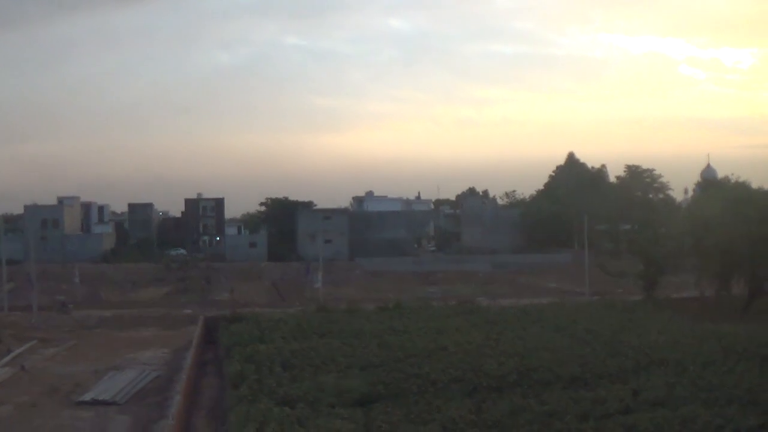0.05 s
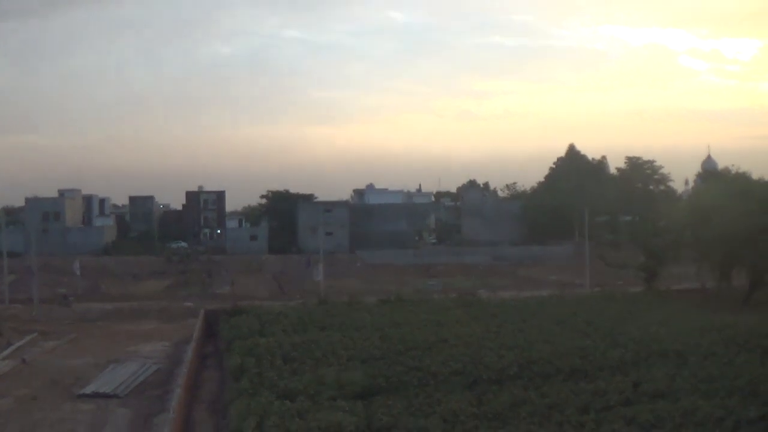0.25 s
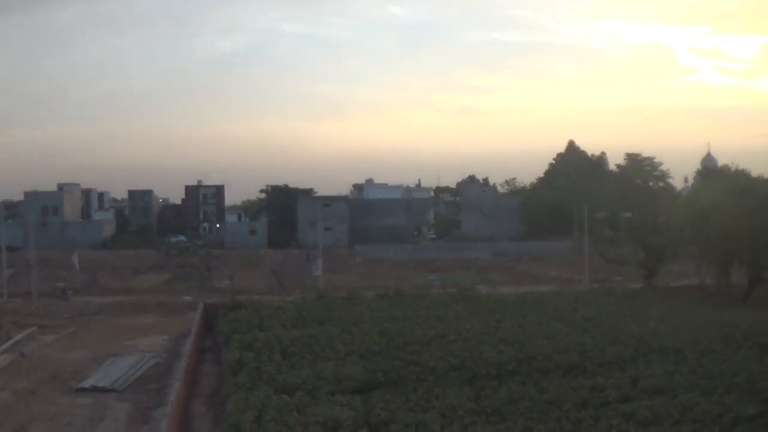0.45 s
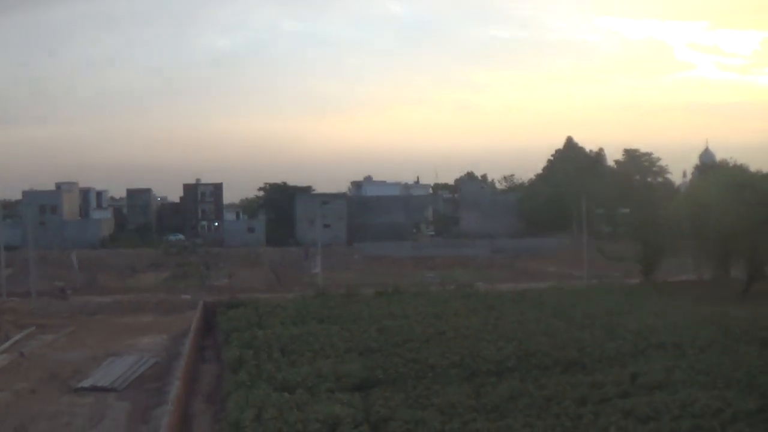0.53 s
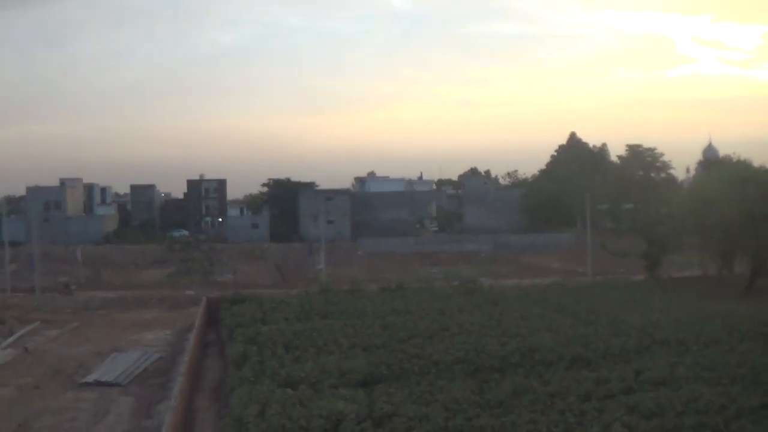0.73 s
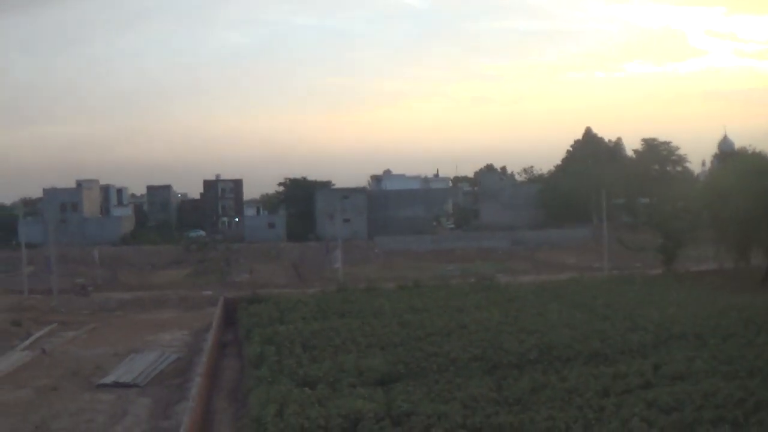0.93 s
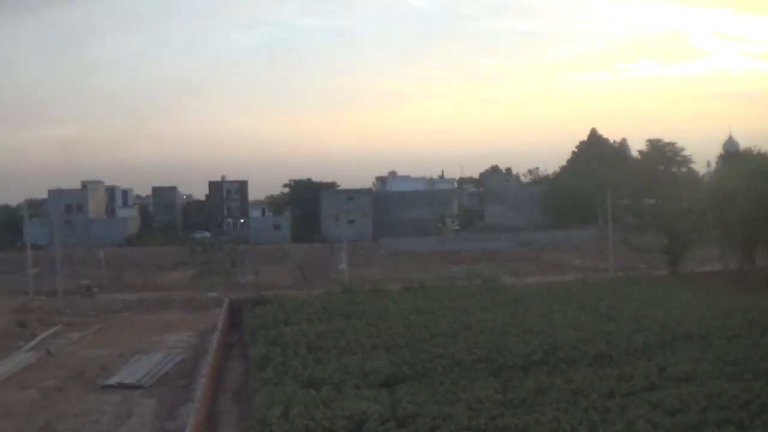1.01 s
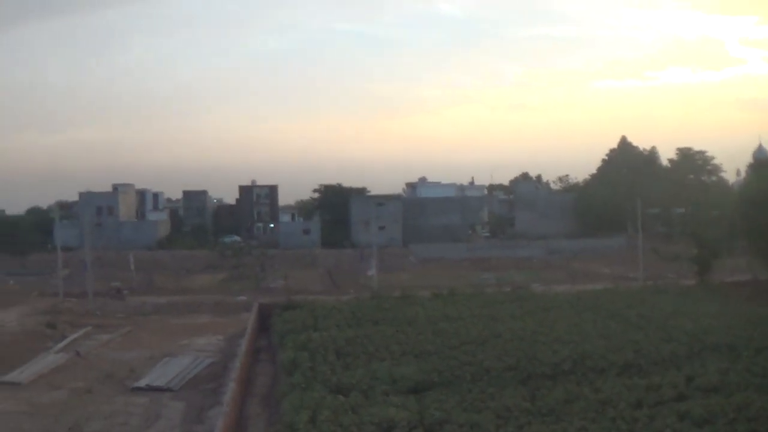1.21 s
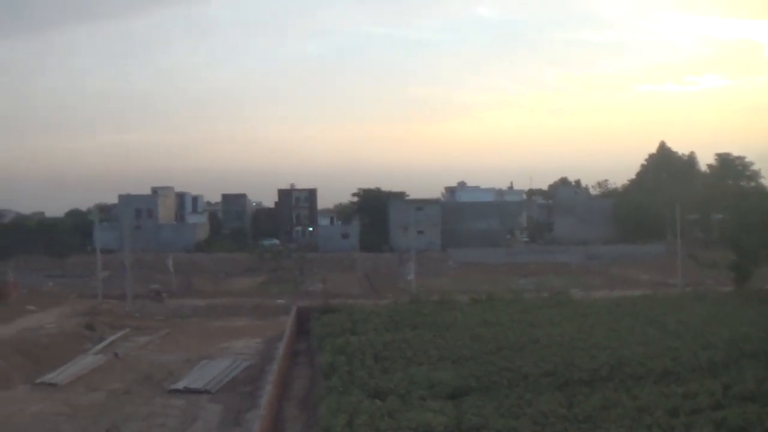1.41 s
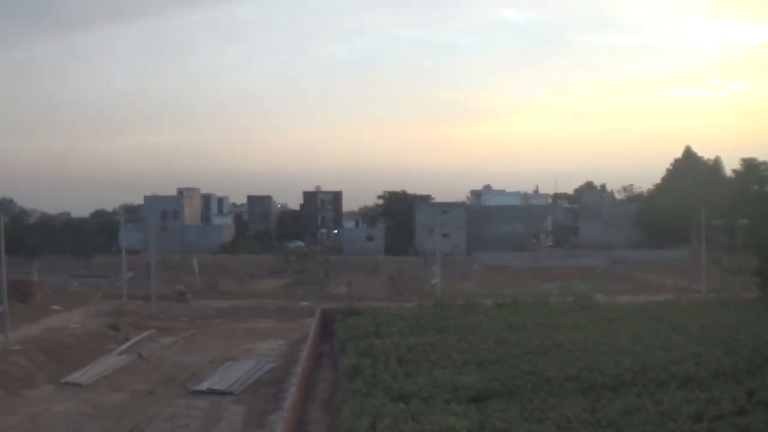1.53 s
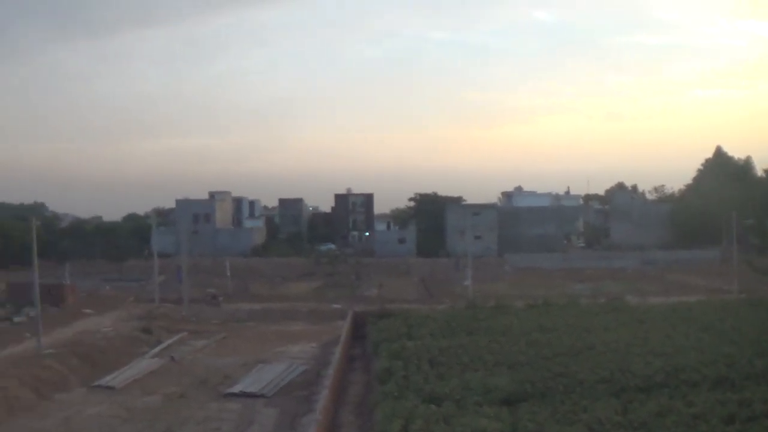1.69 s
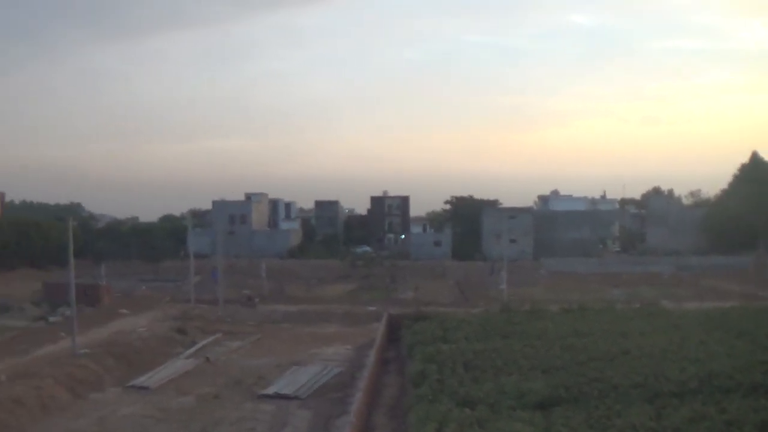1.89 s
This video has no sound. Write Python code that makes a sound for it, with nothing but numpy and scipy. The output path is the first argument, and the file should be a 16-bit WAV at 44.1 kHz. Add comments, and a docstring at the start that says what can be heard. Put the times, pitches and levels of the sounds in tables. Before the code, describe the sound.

Over an open field, a nearby bird rasps, then sings two quick phrases of chirp, whistle and buzzy trill, left of the microphone. Walls return slight echoes, while a far bird, a distant town and light wind stay faint.

```python
"""A rasp from a myna-like bird, close on the left above an open field; then twice a chirp, a whistle
and a buzzy trill. Its syrinx makes gliding tones with air hiss; throat and beak shape the overtones.
The voice bounces off nearby masonry and returns from a wall on the right. A far bird whistles faintly,
a town murmurs in the distance and light wind bumps the microphone."""
import sys
import numpy as np
from scipy import signal
from scipy.fft import rfft, irfft
from scipy.io import wavfile
from scipy.ndimage import uniform_filter1d

SR = 44100
rng = np.random.default_rng(int(sys.argv[2]) if len(sys.argv) > 2 else 0)


def unload_wav(signal):
    """Save mono or channel-first audio to the path in sys.argv[1] as 16-bit WAV at rate SR, clipped to [-1, 1]."""
    wavfile.write(
        sys.argv[1],
        SR,
        np.round(np.clip(np.atleast_2d(signal).T, -1, 1) * 32767).astype(np.int16),
    )


N = 85995
T = np.arange(N) / SR

BIRD_DB = -4  # near bird; its levels below are relative to this
# (time [s], pitch between flicks [Hz], level [dB], flick rise [s], accent at throat ring [dB])
RASP = [(0.129, 2386, -49.5, 0.0008, 7.5), (0.169, 2626, -47, .0009, 16.5),
        (0.224, 2850, -40.5, 0.0011, 12.5), (.27, 2900, -35.5, 0.0038, 10.5),
        (0.319, 2986, -32.5, 0.0058, 8), (.39, 2922, -35.5, 0.0049, 11.5), (0.402, 3080, -40, 0.0024, 7)]
# (time [s], flick rate [1/s])
FLICK_RATE = [(.131, 50), (.21, 52.5), (.28, 55), (.32, 67), (.39, 65)]
# per syrinx side: (time from chirp start [s], pitch [Hz], level [dB])
CHIRP_SIDES = [
    [(0, 2600, -46), (.01, 3070, -29), (.016, 3252, -28), (.021, 2655, -31), (.027, 2110, -28.5)],
    [(.02, 5040, -56), (.028, 4346, -39), (.031, 3423, -27.5), (.034, 2606, -43), (.041, 2606, -27),
     (.046, 2900, -24), (.056, 2802, -30.5), (.06, 2745, -33), (.067, 2207, -30.5), (.071, 2070, -59)],
]
# (start [s], gain [dB])
CHIRPS = [(0.5474, -4), (1.152, -1)]
# (start [s], length [s], pitch [Hz], peak level [dB])
WHISTLES = [(0.615, 0.069, 1932, -28), (1.223, 0.046, 1915, -25.5)]
# per trill: (time [s], pitch [Hz], pulse rate [1/s], fundamental [dB], overtones [dB], warble [0-1])
TRILLS = [
    [(.7445, 1733, 67, -58, -37.5, 0.01), (.79, 1900, 67, -47.5, -31, 0),
     (.825, 2040, 68, -38.5, -27.5, 0.06), (.85, 2219, 68.5, -39.5, -28, 0.01),
     (.90, 2474, 73, -25, -31.5, 0.08), (.95, 2673, 100, -22.5, -34, 0.89),
     (1.0, 2789, 109, -23.5, -27, 0.77), (1.038, 2824, 106, -25, -32.5, 0.63),
     (1.052, 2654, 100, -42, -56, 0.5)],
    [(1.385, 1740, 71, -54, -40, 0.18), (1.415, 1890, 72, -42, -31, 0), (1.44, 2034, 74, -44, -30.5, 0),
     (1.497, 1999, 80, -38, -27, 0.1), (1.533, 2352, 71, -27, -30, 0), (1.57, 2513, 84, -21.5, -41, 0.86),
     (1.61, 2672, 91, -23.5, -26.5, 0.75), (1.636, 3064, 110, -27.5, -33, 1),
     (1.678, 3232, 110, -27.5, -30.5, 0.38), (1.698, 3130, 110, -55, -42, 0.4)],
]
# throat and beak filter on the overtones: (frequency [Hz], gain [dB])
THROAT = [(3300, -9.5), (4000, 0.5), (4700, -11), (5200, -23), (5700, -12), (6000, -11), (6400, -14.5),
          (7100, -16.5), (7800, -15.5), (8500, -25.5), (9200, -18.5), (10200, -21.5)]
# same, beak held wide: (frequency [Hz], gain [dB])
RASP_THROAT = [(5000, -8), (6000, -17), (6750, -10.5), (8800, -25.5), (10300, -15.5)]
# air noise in the voice: (frequency [Hz], gain [dB])
HISS_COLOUR = [(800, -9), (1600, 13.5), (3000, 3), (4500, 12), (5400, 4), (10500, -9)]
# near bird: (frequency [Hz], left boost and right cut [dB])
BIRD_PAN = [(3000, 5.5), (4200, 7), (6000, 4.5), (9000, 1.4)]
# far bird, per note: (time [s], pitch [Hz], level [dB])
FAR_NOTES = [
    [(0, 1205, -54), (.145, 1255, -49), (.16, 1290, -54)],
    [(.38, 1318, -55), (.5, 1332, -51), (.59, 1415, -48), (.64, 1525, -47), (.67, 1555, -43),
     (.725, 1370, -48)],
]
# nearby masonry: (delay [s], left [dB], right [dB])
NEAR_ECHOES = [(.0055, -6.5, -2), (0.0144, -28, -16)]
# far walls: (delay [s], left [dB], right [dB])
FAR_ECHOES = [(0.0758, -17, -9), (0.109, -17.5, -14)]
# far wall reflection: (frequency [Hz], gain [dB])
WALL_COLOUR = [(2000, 4.5), (3600, -4), (7800, 3.5), (9200, 10), (10500, -8)]
# distant murmur: (frequency [Hz], gain [dB])
TOWN_COLOUR = [(40, -26), (100, -11.5), (170, -4), (320, -0.5), (420, -4), (800, -1.5), (1150, -7),
               (1900, -11), (6000, -22), (11000, -29.5)]
# rumble: (time [s], level [dB])
WIND = [(0, -78), (.63, -58.5), (.69, -49), (.83, -49), (.92, -62), (1.15, -51), (1.24, -44.5),
        (1.45, -49.5), (1.56, -53.5), (1.95, -59)]
# puffs on the microphone: (time [s], peak [dB])
PUFFS = [(1.012, -37), (1.636, -34.5)]

FLICK_TOP_HZ, FLICK_FALL_S, RING_HZ, RING_HALF_WIDTH_HZ = 4413, 0.0021, 3756, 370
RASP_OVERTONES_DB, CHIRP_OVERTONES_DB, WHISTLE_OVERTONES_DB = -3.5, -5, -26.5
WHISTLE_SWELL_DB, WHISTLE_TOP_SHARE, WHISTLE_BEND_HZ = 9, 0.88, 45.2
PULSE_DUTY, PULSE_GAP_DB, PULSE_UNEVEN_DB = 0.62, -14.5, 1.3
SAG_SHARE, SAG_CYCLES, WANDER_SHARE = 0.25, 0.16, 0.02
WARBLE_SHARE, WARBLE_DB, CREST_CYCLES, CREST_OVERTONES_DB = 0.13, 1, 0.339, 4
BLUR_RAD, HISS_DB, RASP_HISS_DB = 0.09, -22, 10.5
MIC_TURN_DB_PER_S = 1.7  # microphone turns slowly: the bird drifts further left
FAR_PAN_DB, TOWN_DB, TOWN_PAN_DB = 3.5, -45.5, -0.7
TAIL_DB, TAIL_T60_S, TAIL_CUT_HZ = -5.5, 0.67, 18500
WIND_BAND_HZ, PUFF_WIDTH_S = (75, 214), 0.0126
CUTOFF_HZ = 11000


def near_bird():
    """All calls of the near bird, mono, with hiss that follows the airflow."""
    opening = rasp()
    song = sum(trill(rows) for rows in TRILLS) + sum(chirp(*row) for row in CHIRPS)
    airflow = uniform_filter1d(abs(song) + from_db(RASP_HISS_DB) * abs(opening), size=64)
    hiss = from_db(HISS_DB) * airflow * noise(HISS_COLOUR)
    whistles = sum(whistle(*row) for row in WHISTLES)
    return from_db(BIRD_DB) * (opening + song + hiss + whistles)


def syrinx(hz, level_db, overtones_db, jitter_share=0.01, throat=THROAT):
    """Slightly unsteady tone; its overtones, the higher the more blurred, pass through the throat."""
    phase = 2 * np.pi * np.cumsum(hz * (1 + jitter_share * flutter(hz=870))) / SR
    blur = BLUR_RAD * flutter(hz=260)
    overtones = sum((k * hz < SR / 2) * np.sin(k * phase + (k - 1) * k * blur) for k in range(2, 6))
    fundamental = from_db(level_db) * np.sin(phase)
    return np.sqrt(2) * (fundamental + from_db(overtones_db) * coloured(overtones, throat))


def rasp():
    """Falling ticks turn into upward swoops; each flares as it crosses the throat's ring."""
    base_hz, db, rise_s, accent_db = in_time(RASP)
    rate, = in_time(FLICK_RATE)
    cycle = cycle_position(rate, FLICK_RATE[0][0])
    since_top_s, until_top_s = cycle / rate, (1 - cycle) / rate
    flick = np.exp(-np.minimum(since_top_s / FLICK_FALL_S, until_top_s / rise_s))
    hz = uniform_filter1d(base_hz + (FLICK_TOP_HZ - base_hz) * flick, size=60)  # the syrinx cannot jump
    db = db + accent_db / (1 + ((hz - RING_HZ) / RING_HALF_WIDTH_HZ) ** 2)
    return gate(RASP[0][0], RASP[-1][0]) * syrinx(hz, db, db + RASP_OVERTONES_DB, throat=RASP_THROAT)


def chirp(start_s, gain_db):
    """A pitch arch on one side of the syrinx overlaps a steep fall on the other."""
    both_sides = 0
    for side in CHIRP_SIDES:
        rows = [(start_s + s, hz, db + gain_db) for s, hz, db in side]
        hz, db = in_time(rows)
        both_sides += gate(rows[0][0], rows[-1][0]) * syrinx(hz, db, db + CHIRP_OVERTONES_DB)
    return both_sides


def whistle(start_s, length_s, hz, peak_db):
    """Nearly pure note that settles in pitch as it swells."""
    slack = np.interp((T - start_s) / length_s, [0, WHISTLE_TOP_SHARE, 1], [1, 0, 1]) ** 2
    db = peak_db - WHISTLE_SWELL_DB * slack
    tone = syrinx(hz + WHISTLE_BEND_HZ * slack, db, db + WHISTLE_OVERTONES_DB, jitter_share=0.003)
    return gate(start_s, start_s + length_s) * tone


def trill(rows):
    """Sagging pulses speed up, rise and merge into a fast warble, loudest on its crests."""
    hz, rate, db, overtones_db, merged = in_time(rows)
    cycle = cycle_position(rate, rows[0][0])
    sag_hz = SAG_SHARE * hz * (np.exp(-cycle / SAG_CYCLES) - SAG_CYCLES)
    wander_hz = WANDER_SHARE * hz * flutter(hz=150)
    warble = merged * np.cos(2 * np.pi * (cycle - CREST_CYCLES))
    hz = uniform_filter1d(hz + (1 - merged) * (sag_hz + wander_hz) + WARBLE_SHARE * hz * warble, size=30)
    closing = uniform_filter1d(np.clip((cycle - PULSE_DUTY) / 0.11 + 0.5, 0, 1), size=44)
    gap_db = (1 - merged) * PULSE_GAP_DB * closing
    pulse_db = gap_db + WARBLE_DB * warble + PULSE_UNEVEN_DB * flutter(hz=250)
    overtones_db = overtones_db + CREST_OVERTONES_DB * warble
    return gate(rows[0][0], rows[-1][0]) * syrinx(hz, db + pulse_db, overtones_db + pulse_db)


def far_whistle(rows):
    """One note of the far bird: a faint gliding sine."""
    hz, db = in_time(rows)
    tone = np.sqrt(2) * np.sin(2 * np.pi * np.cumsum(hz) / SR)
    return gate(rows[0][0], rows[-1][0]) * from_db(db) * tone


def surroundings(x):
    """Distinct wall echoes plus thin scatter from trees and houses."""
    walls = echoes(x, NEAR_ECHOES) + echoes(coloured(x, WALL_COLOUR), FAR_ECHOES)
    scatter = filtered(rng.standard_normal((2, N)), TAIL_CUT_HZ, "low") * from_db(-60 * T / TAIL_T60_S)
    scatter /= np.sqrt(np.sum(scatter ** 2, axis=1, keepdims=True))
    return walls + from_db(TAIL_DB) * signal.fftconvolve(scatter, x[None], axes=1)[:, :N]


def echoes(x, rows):
    """Delayed copies, each from its own side."""
    return sum(from_db([[left_db], [right_db]]) * np.interp(T - delay_s, T, x, left=0)
               for delay_s, left_db, right_db in rows)


def town():
    """Steady distant murmur, near centre."""
    murmur = widen(noise(TOWN_COLOUR), noise(TOWN_COLOUR), side_db=-11)
    return from_db(TOWN_DB) * pan(TOWN_PAN_DB) * murmur


def wind():
    """Low rumble on the microphone with two short puffs."""
    db, = in_time(WIND)
    puffs = sum(from_db(peak_db) * np.exp(-((T - s) / PUFF_WIDTH_S) ** 2) for s, peak_db in PUFFS)
    mid, side = unit_rms(filtered(rng.standard_normal((2, N)), WIND_BAND_HZ, "band"))
    return (from_db(db) + puffs) * widen(mid, side, side_db=-10.5)


def from_db(db):
    return 10 ** (np.asarray(db) / 20)


def unit_rms(x):
    return x / np.sqrt(np.mean(x ** 2) + 1e-20)


def in_time(rows):
    """Each column after time, interpolated to every sample."""
    times_s, *columns = np.transpose(rows)
    return [np.interp(T, times_s, column) for column in columns]


def cycle_position(rate, start_s):
    """Position in each cycle, 0-1; zero at start_s."""
    cycles = np.cumsum(rate) / SR
    return (cycles - np.interp(start_s, T, cycles)) % 1


def gate(start_s, end_s):
    """On between two times, 2 ms ramps."""
    return np.clip(np.minimum(T - start_s, end_s - T) / 0.002, 0, 1)


def filtered(x, hz, kind):
    return signal.sosfilt(signal.butter(2, hz, kind, fs=SR, output="sos"), x)


def coloured(x, colour):
    """Zero-phase filter; dB interpolated over log frequency."""
    hz, db = np.transpose(colour)
    bins_hz = np.maximum(np.arange(N // 2 + 1) * SR / N, 1)
    gain = from_db(np.interp(np.log(bins_hz), np.log(hz), db))
    return irfft(rfft(x) * gain, N)


def noise(colour):
    return unit_rms(coloured(rng.standard_normal(N), colour))


def flutter(hz):
    """Random unsteadiness up to hz, rms 1."""
    return unit_rms(filtered(rng.standard_normal(N), hz, "low"))


def pan(db):
    """Left and right gains; positive is left."""
    return from_db(db * np.array([[1], [-1]]))


def widen(mid, side, side_db):
    return mid + from_db(side_db) * side * np.array([[1], [-1]])


def scene():
    """Near bird, far bird, their echoes, town and wind, in stereo."""
    near = near_bird()
    direct = np.array([coloured(near, [(hz, side * db) for hz, db in BIRD_PAN]) for side in (1, -1)])
    drift = pan(MIC_TURN_DB_PER_S * (T - T.mean()))
    far = sum(far_whistle(rows) for rows in FAR_NOTES)
    return direct * drift + far * pan(FAR_PAN_DB) + town() + surroundings(near + far) + wind()


def record(dry):
    """Steep low-pass."""
    return signal.sosfilt(signal.ellip(12, 0.1, 80, CUTOFF_HZ, fs=SR, output="sos"), dry)


dry = scene()
out = record(dry)
unload_wav(out)
```